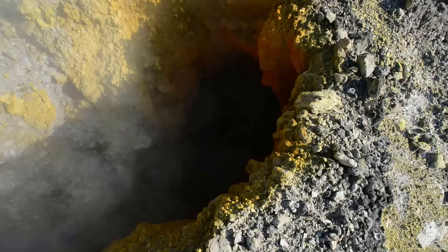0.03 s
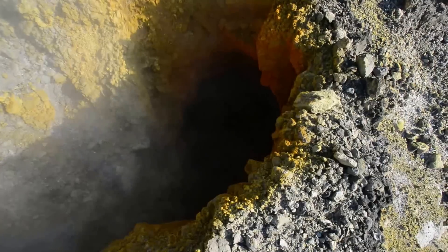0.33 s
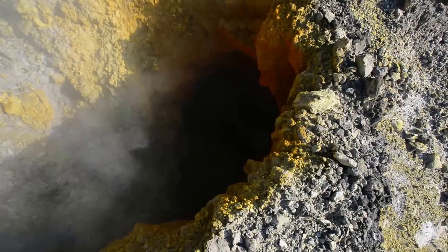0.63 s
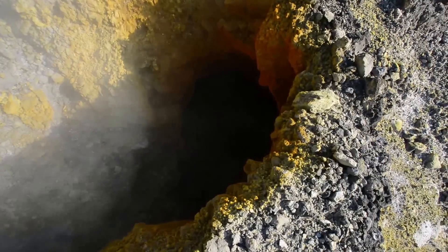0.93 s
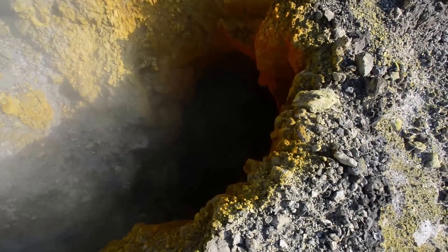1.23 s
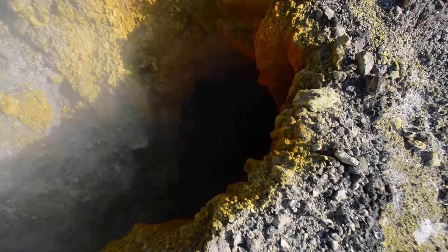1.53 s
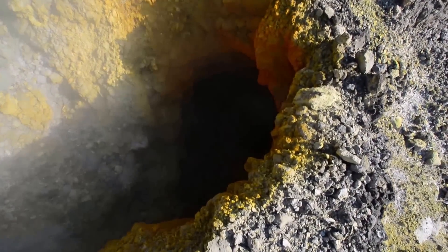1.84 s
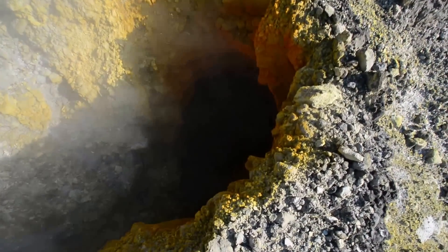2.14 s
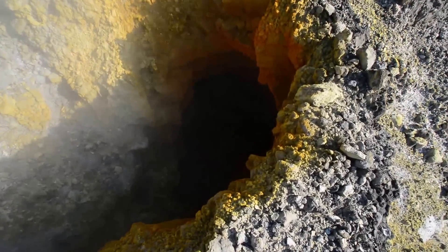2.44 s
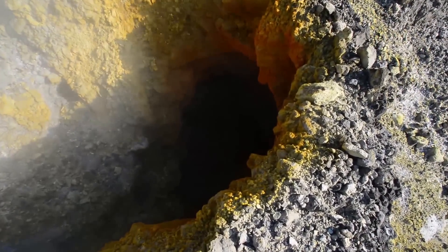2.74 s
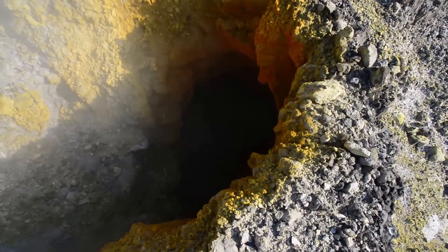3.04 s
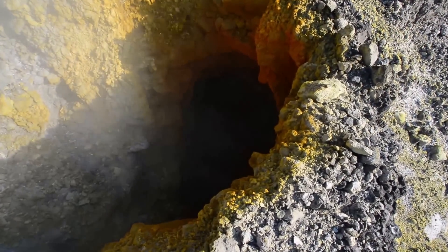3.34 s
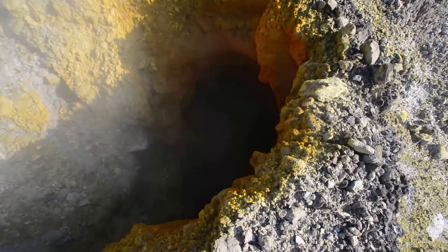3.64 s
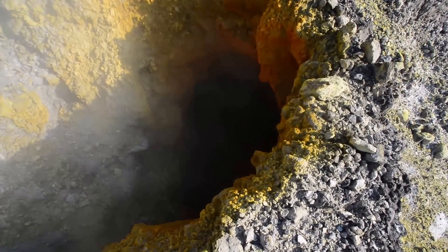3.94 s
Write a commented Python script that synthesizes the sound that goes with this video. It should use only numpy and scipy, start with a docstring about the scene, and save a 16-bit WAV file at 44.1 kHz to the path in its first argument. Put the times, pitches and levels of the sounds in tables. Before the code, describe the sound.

Steam rushes from a rocky volcanic vent outdoors, swelling in quickly after a few small handling clicks. It holds a deep rumble, hollow roar and soft hiss, while wind now and then thumps the microphone.

```python
"""A fumarole starts faint, under a few small handling clicks, and swells to full level within half a second.
Then the steam pours on: a deep rumble, a smooth hiss at the mouth and a hollow roar coloured by the
rocky throat, with a narrow hoot blown on and off.
From about a second in, an eddy of air now and then thumps the microphone and a bit of grit ticks."""
import sys
import numpy as np
from scipy import signal
from scipy.fft import rfft, irfft, next_fast_len
from scipy.io import wavfile
from scipy.ndimage import map_coordinates

SR = 44100
rng = np.random.default_rng(int(sys.argv[2]) if len(sys.argv) > 2 else 0)


def store_wav(level_fs):
    """Save 16-bit WAV to argv[1]."""
    pcm = np.round(np.clip(np.atleast_2d(level_fs), -1, 1) * 32767)
    wavfile.write(sys.argv[1], SR, pcm.T.astype(np.int16))


N = 176400

# fade-in of rumble, hiss and roar: time_s, gain_db
FADE_IN = [(.1, -16.5), (.22, -13.5), (.32, -6.5), (.42, -1.5), (.55, 0.5)]
# tone of the rumble: frequency_hz, gain_db
RUMBLE_EQ = [(12, -18), (25, -16), (43, -8.5), (65, -6.5), (96, 1.5), (125, -7.5), (152, -5), (210, -13.5),
             (280, -17.5), (500, -40.5), (1200, -67)]
# gusts riding the rumble: time_s, gain_db
RUMBLE_GUSTS = [(.3, -2), (.48, 1), (.58, -3), (.74, 1.5), (.82, -1), (.93, 2), (1.02, -1.5), (1.3, -0.5),
                (1.4, 2), (1.55, -1.5), (1.78, -2.5), (1.9, 0), (2.05, -2), (2.42, 0), (2.76, -0.5),
                (2.86, -1), (3.1, 0), (4, 0.5)]
# tone of the hiss: frequency_hz, gain_db
HISS_EQ = [(800, -5.5), (2500, 1.5), (4000, 2), (5500, 0.5), (7600, 1), (8600, -1.5), (10000, -7),
           (12500, -11), (15700, -13)]
# ticking grains: start_s, level_db, pitch_hz, width_hz, t60_s
GRIT_TICKS = [(1.592, -62, 12200, 2000, .04), (1.765, -53.5, 5500, 900, .025),
              (2.1089, -40.5, 1250, 1300, 0.014), (3.098, -64, 12300, 2000, .04)]
# handling clicks: start_s, level_db
HANDLING_CLICKS = [(.131, -59), (.195, -58), (0.201, -48), (.213, -41)]
# ring of the casing: pitch_hz, gain_db, t60_s
CASING_MODES = [(2170, -20.5, .014), (3270, -5, 0.012), (3660, -6, 0.0067)]
# eddies hitting the microphone: start_s, level_db, pitch_hz
EDDIES = [(.892, -19, 102), (1.432, -26, 130), (2.3176, -24.5, 123), (2.337, -25, 85), (2.4724, -22, 205),
          (2.628, -28, 124), (2.764, -28, 95), (2.962, -20, 99.6), (3.143, -29, 135), (3.289, -27, 120),
          (3.994, -23.5, 109)]
# a narrow resonance blown on and off: time_s, level_db
HOOT_LEVELS = [(.4, -64), (1.3, -68), (1.7, -54), (2.0, -60), (2.35, -52.5), (2.75, -56.5), (3.2, -54.5),
               (3.52, -54.5), (4, -53)]
# broad tone of the roar: frequency_hz, gain_db
ROAR_EQ = [(120, -28.5), (280, -4.5), (500, -2), (800, -3.5), (950, -8.5), (1300, -13.5), (1800, -17.5),
           (2600, -23), (4000, -35.5), (9000, -52)]
# resonances of the rocky throat: pitch_hz, width_hz, boost_db
THROAT_RESONANCES = [(329, 24.5, 6), (438.5, 37, 10), (513, 42, 4.5), (632.5, 43, 5.5), (757, 46, 3.5),
                     (890, 21, 4.5), (1020, 40, 2.5), (1123, 52, 6), (1182, 39, 6), (1411, 75, 6)]
# strength of the flow driving the roar: time_s, gain_db
STEAM_FLOW = [(.5, -1), (.9, 0.14), (1.5, -0.44), (2.1, 0.3), (2.5, 0.2), (2.95, -0.46), (3.6, -0.7),
              (4, 0.4)]


def amp(db):
    """Decibels to gain."""
    return 10 ** (np.asarray(db) / 20)


def eq_db(points, hz):
    """An EQ curve's gain at hz, read on a log frequency axis."""
    frequencies, gains_db = np.transpose(points)
    return np.interp(np.log(hz + 1), np.log(frequencies + 1), gains_db)


def clock():
    """Time of every sample, in seconds."""
    return np.arange(N) / SR


def automation(points):
    """A fader ride: straight lines between timed points."""
    return np.interp(clock(), *np.transpose(points))


def wobble(rate_hz):
    """A smooth random curve through rate_hz points a second."""
    return map_coordinates(rng.standard_normal(4000), [clock() * rate_hz], mode="wrap")


def filtered(x, response):
    """Shape x with a frequency response."""
    size = next_fast_len(N + SR // 2)
    return irfft(rfft(x, size) * response(np.fft.rfftfreq(size, 1 / SR)), size)[:N]


def noise(response):
    """Coloured noise of rms 1."""
    coloured = filtered(rng.standard_normal(N), response)
    return coloured / np.sqrt(np.mean(coloured ** 2) + 1e-20)


def bell(f, hz, width_hz):
    """A resonance curve with top 1 and steep skirts."""
    return 1 / (1 + ((f - hz) / width_hz) ** 2) ** 2


def decay(start_s, t60_s):
    """An envelope with an instant attack and a tail that falls 60 dB in t60_s."""
    age = clock() - start_s
    return (age >= 0) * amp(-60 * np.abs(age) / t60_s)


def rumble(level_db=-38, lump_db=1):
    """Moving gas and wind lay down a deep, lumpy bed."""
    gain = amp(level_db + automation(RUMBLE_GUSTS) + lump_db * wobble(rate_hz=25))
    return gain * noise(lambda f: amp(eq_db(RUMBLE_EQ, f)))


def rim_hiss(level_db=-61.5, shimmer_db=.31):
    """Steam brushes the rim: an almost even hiss."""
    gain = amp(level_db + shimmer_db * wobble(rate_hz=25))
    return gain * noise(lambda f: amp(eq_db(HISS_EQ, f)))


def grit_ticks():
    """Loose grains tick faintly, each in its own band."""
    return sum(amp(level_db) * decay(start_s, t60_s) * noise(lambda f: bell(f, pitch_hz, width_hz))
               for start_s, level_db, pitch_hz, width_hz, t60_s in GRIT_TICKS)


def handling_clicks(crack_db=-7, crack_t60_s=.008, high_cut_hz=10500):
    """Each click is a short crack and a brief ring of the casing."""
    out = np.zeros(N)
    for start_s, level_db in HANDLING_CLICKS:
        age = clock() - start_s
        ring = sum(amp(gain_db) * decay(start_s, t60_s) * np.sin(2 * np.pi * pitch_hz * age)
                   for pitch_hz, gain_db, t60_s in CASING_MODES)
        crack = amp(crack_db) * decay(start_s, crack_t60_s) * rng.standard_normal(N)
        out += amp(level_db) * (ring + crack)
    return filtered(out, lambda f: 1 / (1 + (f / high_cut_hz) ** 10))


def eddy_thumps(half_length_cycles=.39):
    """Each eddy is a brief push and pull of pressure on the microphone, centred on its cue."""
    out = np.zeros(N)
    for cue_s, level_db, pitch_hz in EDDIES:
        cycles = pitch_hz * (clock() - cue_s)
        envelope = np.exp(-.5 * (cycles / half_length_cycles) ** 2)
        out -= amp(level_db) * envelope * np.sin(2 * np.pi * cycles)
    return out


def hoot(pitch_hz=822.5, width_hz=23.4):
    """One narrow resonance is blown on and off: a breathy note."""
    return amp(automation(HOOT_LEVELS)) * noise(lambda f: bell(f, pitch_hz, width_hz))


def throat_roar(level_db=-45, flutter_db=.68, surge_db=.5):
    """Turbulent gas sounds the throat's resonances and flutters with the flow."""
    def hollow_tone(f):
        boosts_db = sum(db * bell(f, hz, width_hz) for hz, width_hz, db in THROAT_RESONANCES)
        return amp(eq_db(ROAR_EQ, f) + boosts_db)

    turbulence_db = flutter_db * wobble(rate_hz=70) + surge_db * wobble(rate_hz=7)
    return amp(level_db + automation(STEAM_FLOW) + turbulence_db) * noise(hollow_tone)


def scene(start_s=.081, attack_s=.003):
    """The vent swells in; ticks, clicks and thumps sit on top, all in mono."""
    attack = np.clip((clock() - start_s) / attack_s, 0, 1)
    swell = attack * amp(automation(FADE_IN))
    vent = rumble() + rim_hiss() + hoot() + throat_roar()
    return (swell * vent + grit_ticks() + handling_clicks() + eddy_thumps())[None]


def record(dry, low_cut_hz=24, high_cut_hz=15720):
    """The microphone sheds the deepest bass; a brick-wall cut takes off the very top."""
    low_cut = signal.butter(2, low_cut_hz, "highpass", fs=SR, output="sos")
    return np.array([filtered(x, lambda f: f < high_cut_hz) for x in signal.sosfilt(low_cut, dry)])


dry = scene()
out = record(dry)
store_wav(out)
```